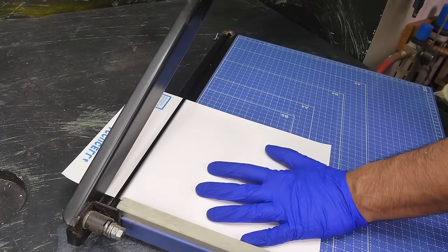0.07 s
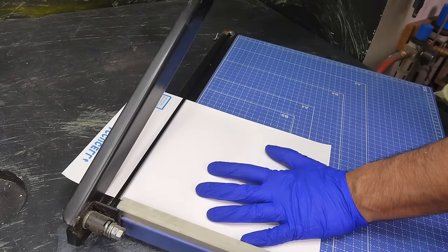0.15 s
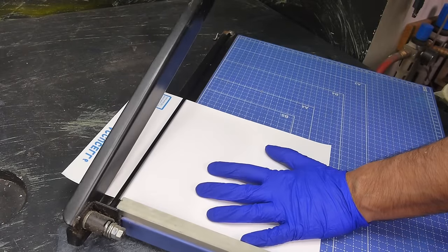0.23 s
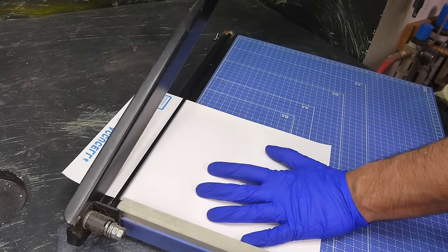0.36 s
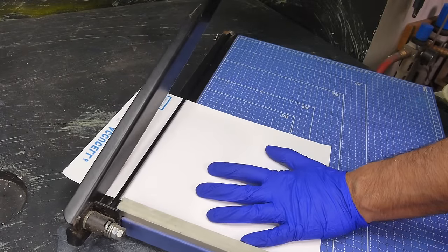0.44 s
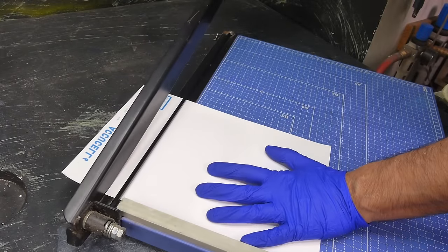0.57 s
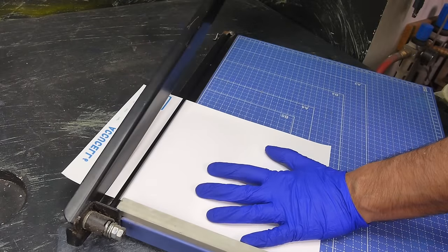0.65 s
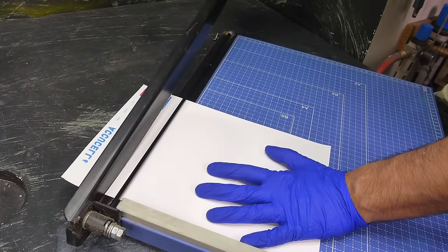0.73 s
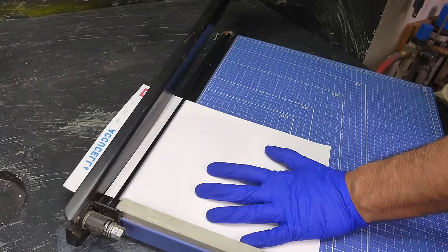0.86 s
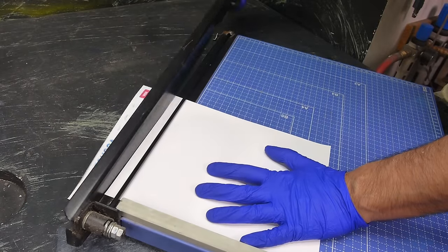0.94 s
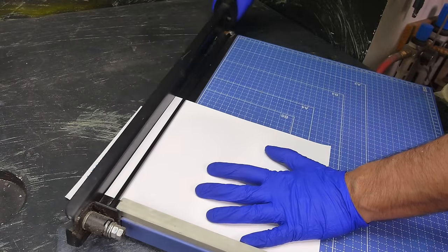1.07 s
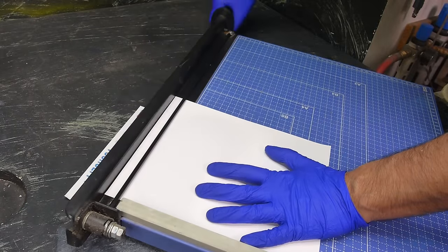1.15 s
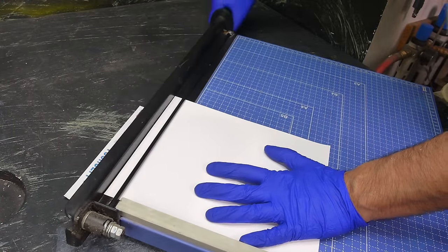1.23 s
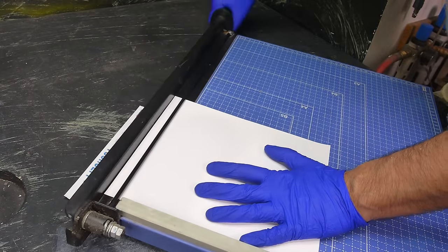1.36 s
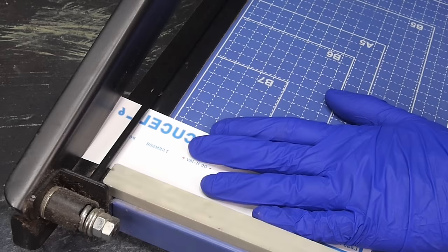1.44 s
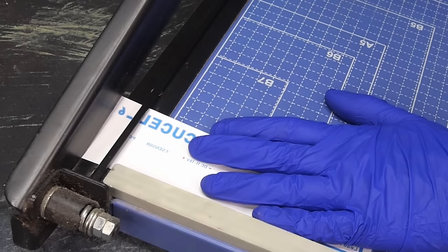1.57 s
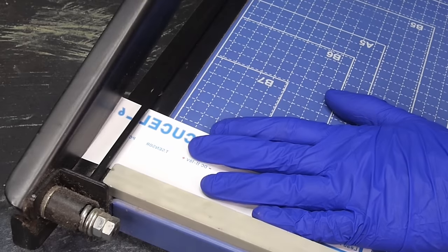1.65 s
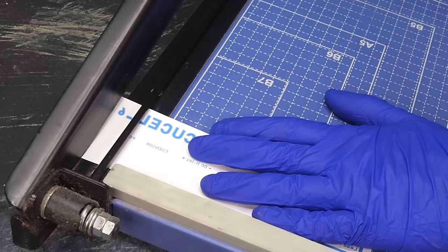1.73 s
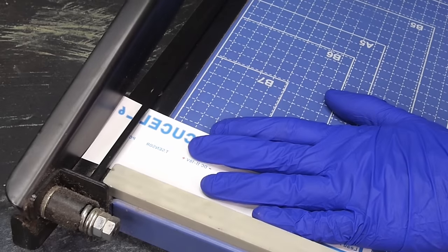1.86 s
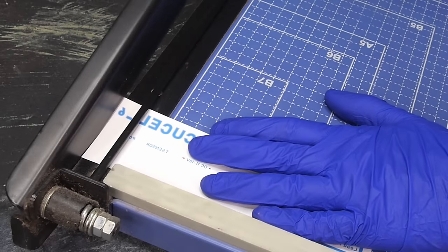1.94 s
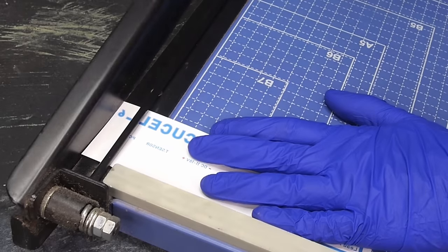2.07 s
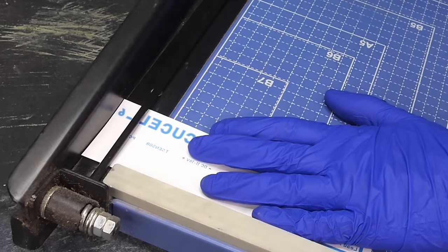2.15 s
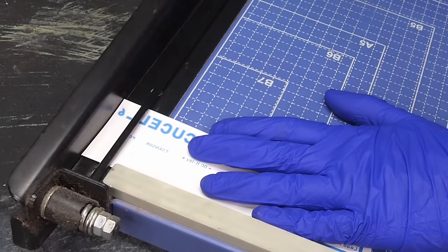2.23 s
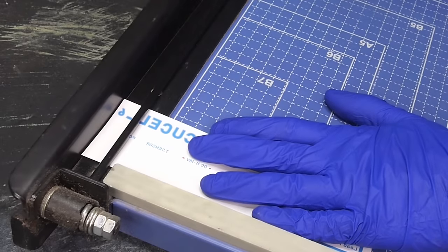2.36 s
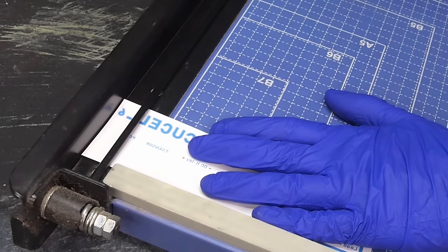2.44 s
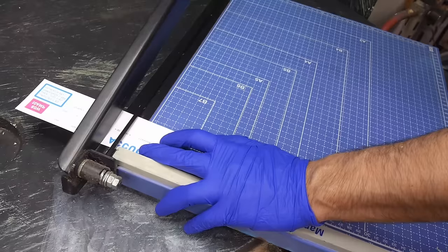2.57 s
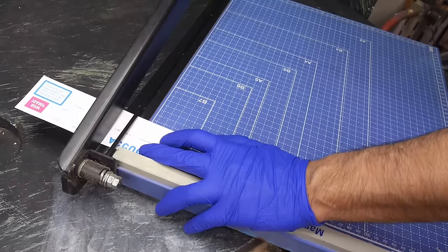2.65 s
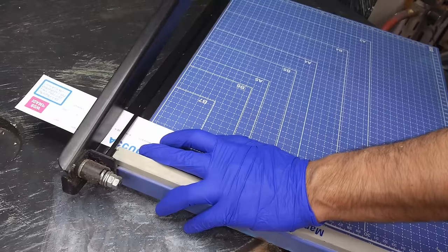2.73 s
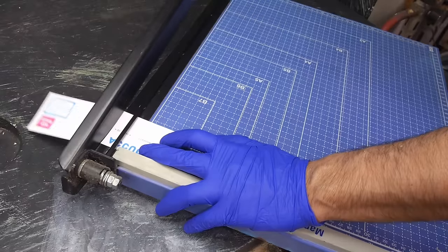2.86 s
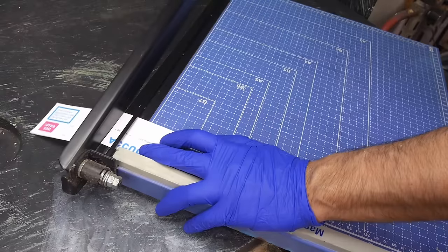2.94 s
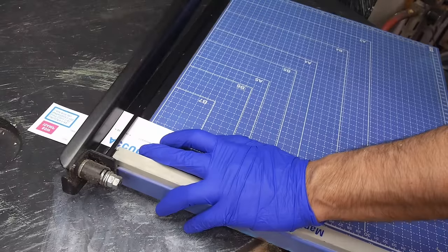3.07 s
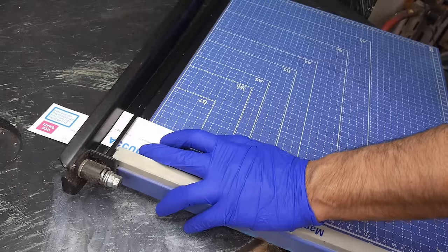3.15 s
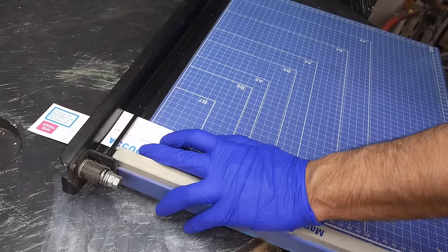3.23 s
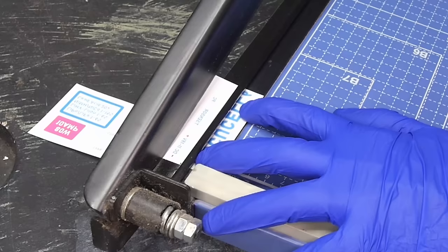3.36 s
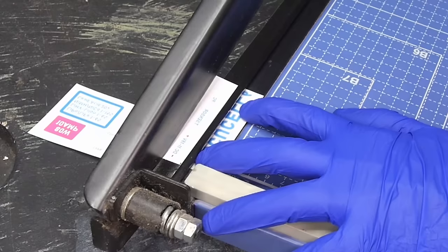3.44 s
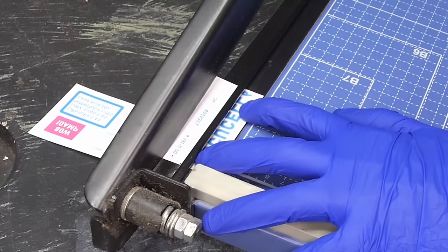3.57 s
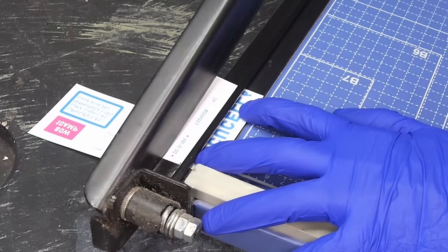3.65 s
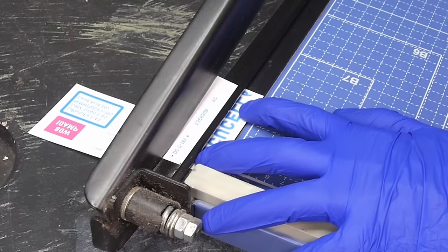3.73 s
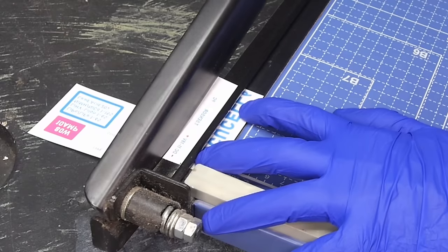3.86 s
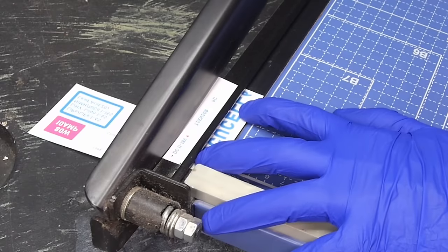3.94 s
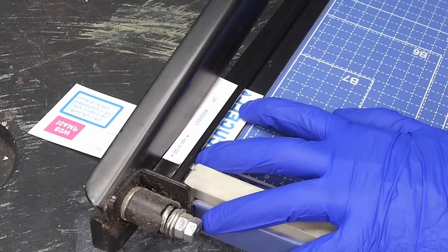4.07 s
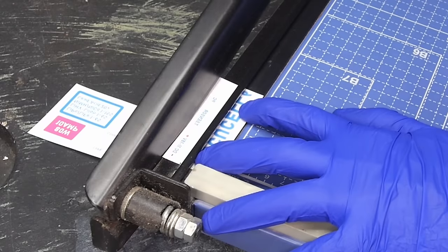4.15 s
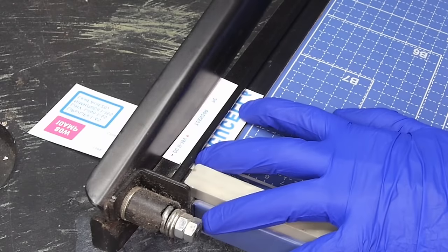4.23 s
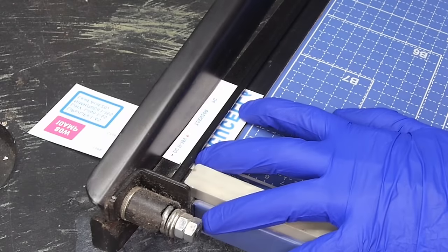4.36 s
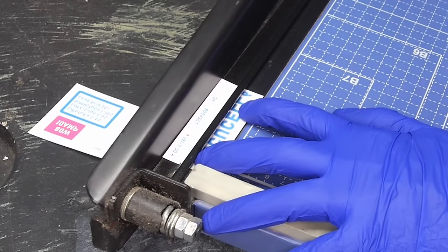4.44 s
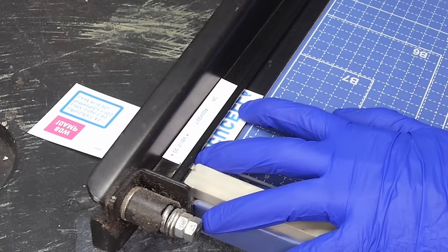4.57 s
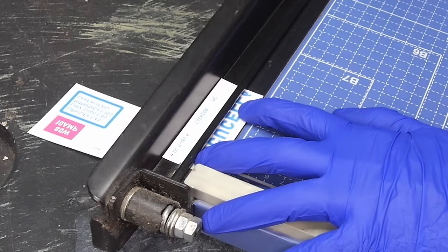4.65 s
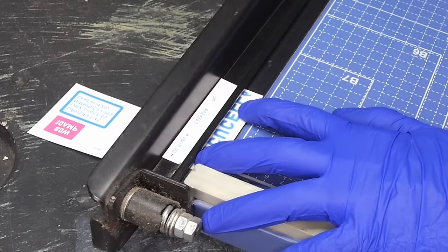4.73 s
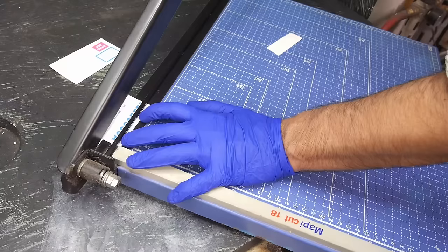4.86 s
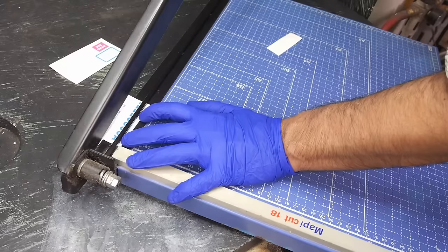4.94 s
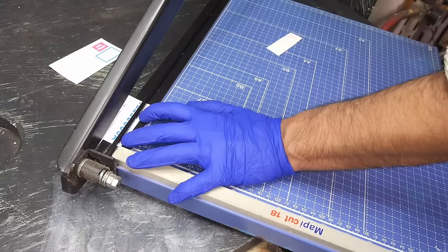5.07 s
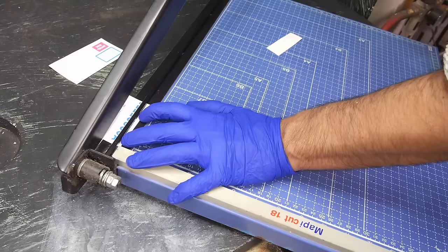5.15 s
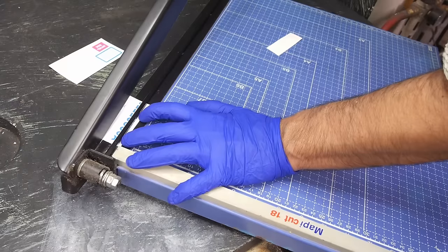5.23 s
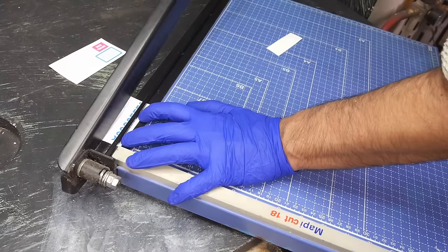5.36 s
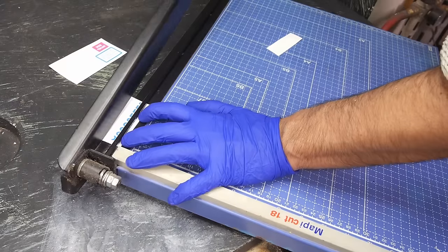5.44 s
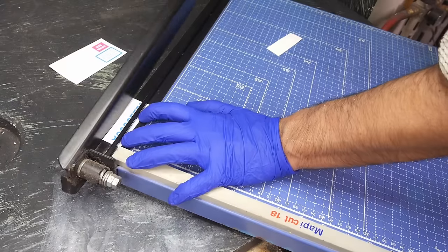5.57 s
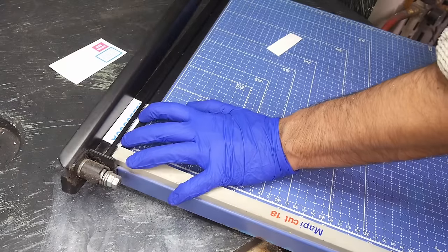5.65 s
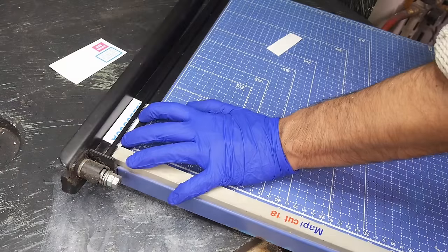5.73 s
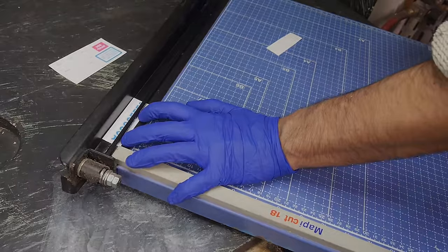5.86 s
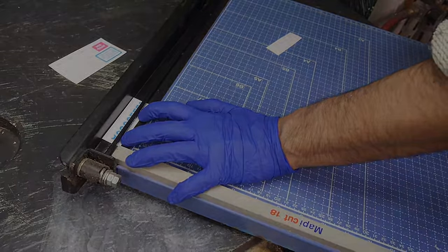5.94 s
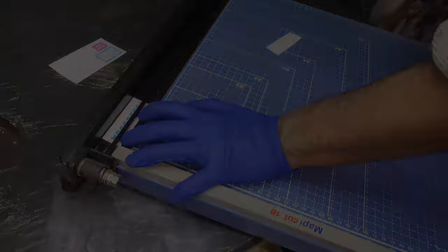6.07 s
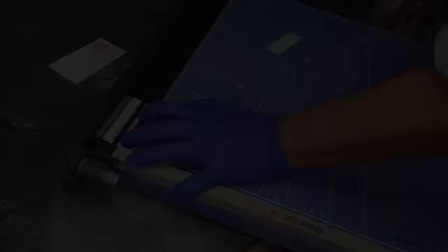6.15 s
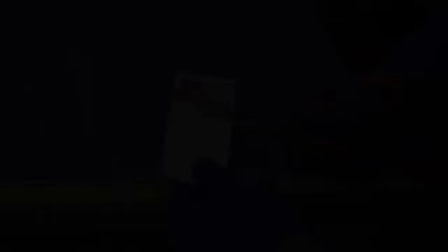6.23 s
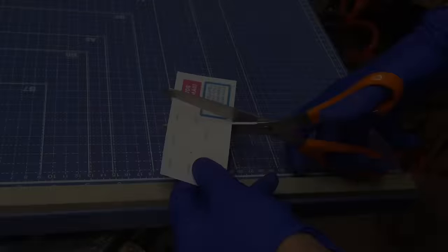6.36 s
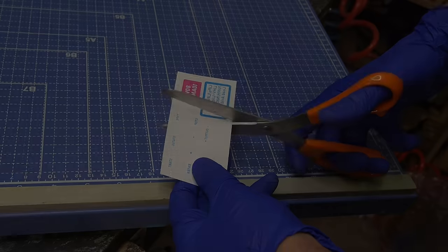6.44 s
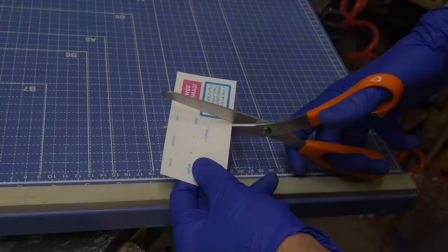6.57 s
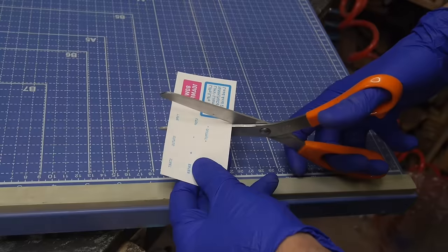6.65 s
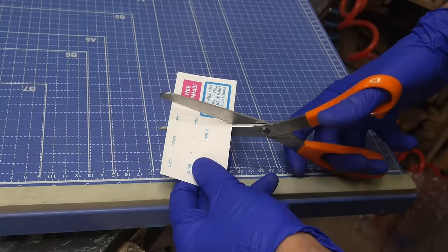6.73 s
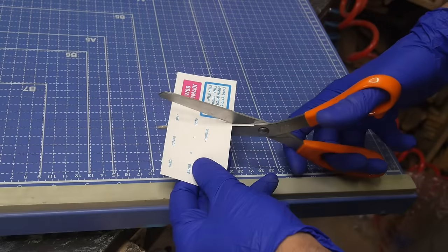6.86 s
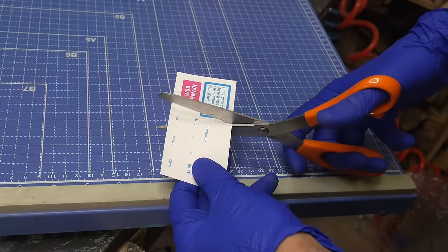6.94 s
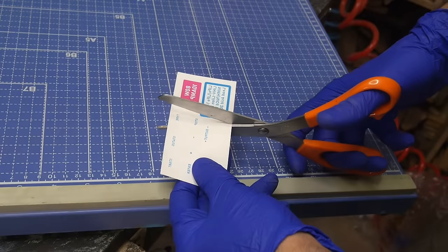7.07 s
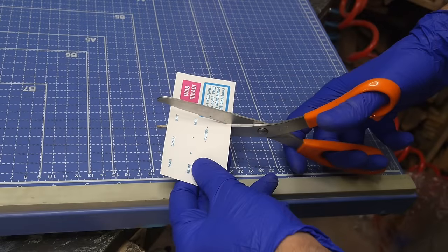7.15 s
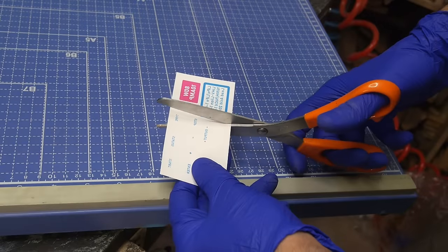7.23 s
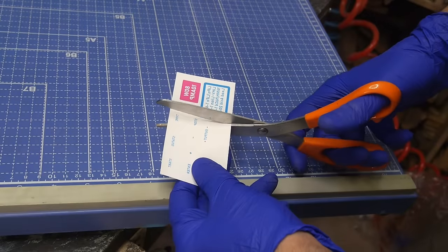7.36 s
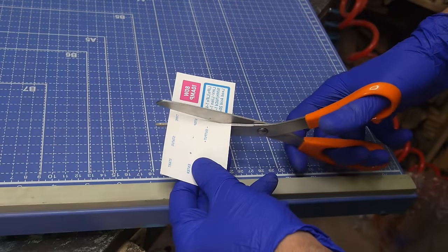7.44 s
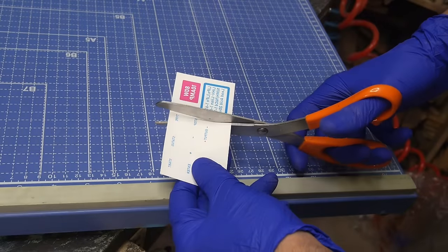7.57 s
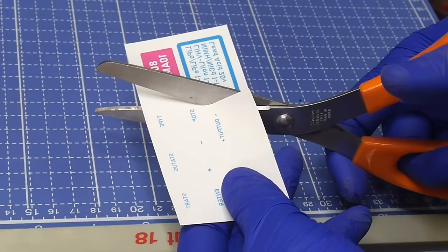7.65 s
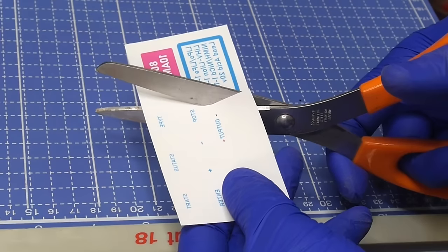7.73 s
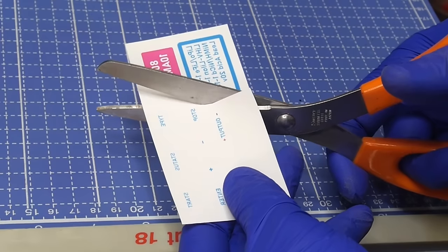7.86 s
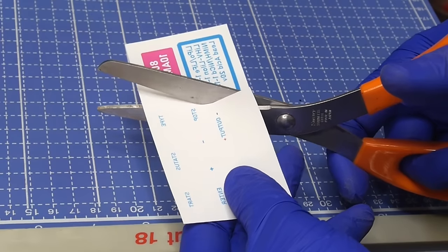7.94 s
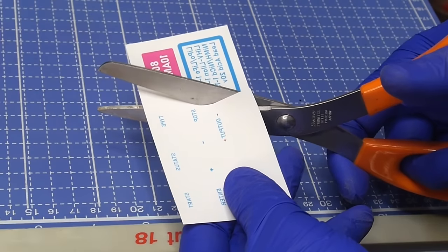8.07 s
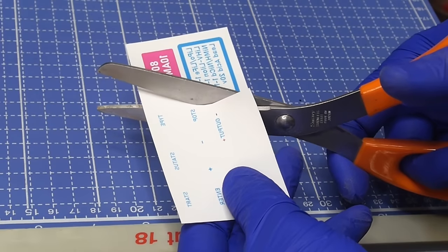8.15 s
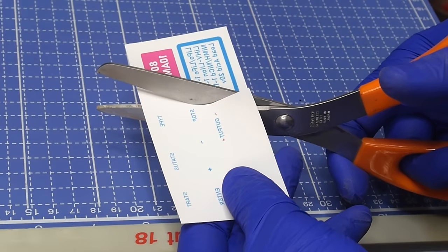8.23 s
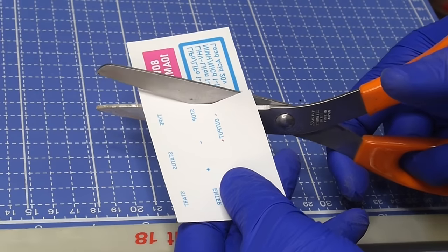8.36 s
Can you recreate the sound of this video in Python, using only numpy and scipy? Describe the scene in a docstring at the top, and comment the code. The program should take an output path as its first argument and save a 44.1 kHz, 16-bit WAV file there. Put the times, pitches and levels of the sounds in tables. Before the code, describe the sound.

A lever paper cutter, heard from close by, shears paper in five swelling, rasping strokes, three of which break off abruptly. The first has a short singing steel tone and a hard knock, and each later one carries a dull boom from the board. Small crisp paper snaps fall in between. At the end, scissors make faint little clicks in a card against the soft air of a quiet workshop.

```python
"""Faint paper snaps in a quiet workshop, then five strokes of a lever paper cutter. The steel blade grinds
along the bed edge, ringing board and blade while the sheet tears. In the first stroke the blade sings and the
lever knocks; in the others the board booms as the sheet parts. The sound stops sharply at the end of three
strokes. Afterwards scissors nibble faintly at a card."""
import sys
import numpy as np
from scipy import signal
from scipy.fft import rfft, irfft, next_fast_len
from scipy.io import wavfile
from scipy.ndimage import uniform_filter1d, map_coordinates

SR = 44100
rng = np.random.default_rng(int(sys.argv[2]) if len(sys.argv) > 2 else 0)


def transcribe(signal):
    """Save signal, clipped to [-1, 1], as a 16-bit WAV file at the path in sys.argv[1]."""
    frames = np.atleast_2d(signal).T
    limited = np.clip(frames, -1, 1)
    pcm = np.round(limited * 32767).astype(np.int16)
    wavfile.write(sys.argv[1], SR, pcm)


N = 370440
T = np.arange(N) / SR

# stereo image of close and distant sounds: (frequency [Hz], left-right likeness [0-1])
NEAR_IMAGE = [(60, 1), (180, 1), (550, 0.92), (1650, 0.92), (3000, .95), (8000, 0.72), (15000, 0.75)]
FAR_IMAGE = [(60, 1), (240, 0.98), (950, 0.47), (3770, 0.96), (15000, 0.86)]
# tone colour of room air, crisp paper and tearing: (frequency [Hz], relative density [dB])
AIR_COLOUR = [(35, -29.5), (60, -11.5), (152, -30), (187, -14), (272, -20), (394, -18), (585, -16.5),
              (642, -20.5), (889, -17), (999, -20), (1590, -22.5), (1790, -24.5), (2360, -31.5),
              (6710, -44), (15500, -61.5)]
CRISP_COLOUR = [(760, -38), (1300, -10.5), (2430, -12), (4010, -14.5), (4580, -24), (5280, -16.5),
                (15000, -47.5)]
TEAR_COLOUR = [(400, -28.5), (1000, -6.5), (2300, -2.5), (2760, -4.5), (3430, -10.5), (4150, -8),
               (4390, -12.5), (5150, -12), (5710, -15), (7030, -18), (8650, -19.5), (10100, -18.5),
               (13500, -26), (15500, -38)]
# a faint low drone: (frequency [Hz], relative level [dB])
DRONE_TONES = [(44.5, -76.5), (90, -88)]
# paper snaps near the blade: (time [s], relative level [dB])
PAPER_SNAPS = [(0.1374, -68), (0.2154, -66), (0.2788, -66), (0.8154, -31.5), (1.035, -47), (1.492, -72.5),
               (1.5877, -59), (1.651, -60), (2.161, -34.5), (3.674, -63), (4.033, -53), (4.726, -44.5),
               (4.796, -50.5), (5.3376, -60.5), (5.975, -46), (6.2446, -61)]
# one list a stroke; pressure sets the board level, the grind top is the moving upper edge of its band:
# (time [s], board level [dB], grind top [Hz], tearing level [dB])
CUTS = [
    [(0.36, -64, 700, -68), (0.5, -52.5, 720, -60), (0.62, -40.5, 800, -57), (0.73, -36, 1400, -49.5),
     (0.85, -33.5, 1520, -44), (0.93, -25.5, 1588, -40), (0.99, -27, 2232, -42), (1.06, -29.5, 2200, -39.5),
     (1.1, -35.5, 1600, -53), (1.2, -25.5, 2200, -47), (1.26, -28.5, 1900, -51.5), (1.38, -47, 1200, -69.5),
     (1.48, -65, 800, -85)],
    [(1.49, -73, 780, -75), (1.78, -75, 750, -74), (1.93, -43, 850, -55), (2.06, -36, 1450, -53),
     (2.13, -31.5, 1700, -47), (2.21, -35.5, 1100, -61), (2.3, -37, 950, -63), (2.36, -35, 896, -60),
     (2.4, -32.5, 1800, -57), (2.563, -37.5, 1750, -63)],
    [(2.575, -59, 600, -73), (2.62, -72, 570, -67), (2.74, -49.5, 700, -60), (2.89, -39.5, 1000, -56),
     (3.0, -31.5, 1700, -47.5), (3.07, -37, 1300, -64.5), (3.15, -34.5, 802.5, -65),
     (3.21, -36.5, 896.4, -58), (3.26, -30, 1750, -54), (3.397, -36.5, 1600, -68.5)],
    [(3.41, -67.5, 750, -65), (3.57, -64.5, 750, -70.5), (3.67, -77.5, 750, -83.5), (3.77, -50.5, 760, -63),
     (4.04, -40, 780, -60), (4.15, -42, 780, -60.5), (4.3, -35, 1550, -51), (4.44, -28, 1550, -45.5),
     (4.5, -35.5, 1500, -62), (4.58, -43, 800, -70.5), (4.72, -42, 770, -72), (4.74, -45, 770, -60),
     (4.79, -48, 760, -72), (4.853, -56.5, 750, -84)],
    [(5.08, -96, 800, -82.5), (5.4, -78.5, 800, -75.5), (5.412, -67, 807, -64.5), (5.46, -44.5, 820, -58.5),
     (5.53, -35, 1300, -49), (5.6, -31.5, 2169, -44), (5.67, -27.5, 2200, -38), (5.76, -36, 1500, -58),
     (5.9, -38, 1000, -65.5), (6.02, -53, 745.6, -73.5), (6.13, -75.5, 700, -74.5), (6.27, -95.5, 697, -82)],
]
# one value a stroke: left against right [dB]
CUT_PAN_DB = [1, -1.3, -0.25, -0.076, 0.12]
# one value a stroke: blade against board at a grind top of 1 kHz [dB], and its rise [dB/octave]
BLADE_MIX_DB = [-1.5, -3, -4, -3.5, -2]
BLADE_RISE_DB = [4, 5.9, 5.6, 3, 5.65]
# resonances, weighted anew by grip and sheet in each stroke:
# (frequency [Hz], width [Hz], relative level [dB], five changes for strokes 1-5 [dB])
BOARD_MODES = [(138.9, 20, -6.5, 0.17, 2.5, 0.99, 1.5, -2.5), (210, 25, -13.5, 0, -1.5, -1, -1, -0.5),
               (299, 21, -6, 0.96, 1, -0.57, -0.5, 8), (372, 40, -13, -0.41, -5, -1, 2, -1.5),
               (411.2, 15, 0, -1, -3, -0.82, -1.8, -1), (524, 4.8, -4.5, -1.2, -6.5, -2.2, -2, 6.5)]
BLADE_MODES = [(589, 24, -6.5, -4.5, 5.5, 2.5, 1, 6), (652.8, 10, 1.5, 2.5, -0.5, 1.5, -1.5, -10),
               (702.3, 16, -6, -2.5, 6.5, -1.5, -0.5, 2), (761.5, 25, -10, 2, 4, 0, -4, -0.5),
               (878, 18, -13, 7, 2.5, 2.5, -2.5, -4), (956.5, 29, -10, 2.5, 7, 0, -1.5, -6),
               (1093.7, 170, -13, 3, 1.5, 2, 0.5, -0.5), (1168, 41, -9, 5, -4, -3.5, -1, -0.5),
               (1221, 19, -9.5, -3.5, 2.5, 2.5, 2, 2), (1340, 15, -15.5, 7, -7.5, 0, 1.5, -2.5),
               (1346.7, 15, -5, -1, 14, -5, 2, -4), (1406, 18, -7, 1, 8.5, -4, 1, -2.5),
               (1450, 24, -8, -1, -5, 0, 2, -2.5), (1566, 82, -11.5, -3.5, 1, 2.5, -2.5, -3.5),
               (1727, 23, -10, 2, -1, -0.5, 4, 1.5), (1909, 50, -11, -9, -1.5, 2, 0.5, 2.5),
               (2105, 24, -11, 3, -2.5, 3, 6, 8), (2180, 8.1, -10.5, 0, 0, 5, -2, 5)]
# high steel modes lit by the tearing: (frequency [Hz], width [Hz], relative level [dB])
SHEEN_MODES = [(2440, 40, 2), (2570, 28, -2), (2800, 40, 0), (2990, 30, 0), (3170, 57, 3), (3570, 41, 4.5),
               (4120, 75, -2), (4680, 81, 1.5), (5037, 150, 3), (5420, 52, 5), (5840, 70, 0.5),
               (6500, 33, -1.5), (7776, 49, -3), (8510, 110, -6.5), (9830, 90, 5.5), (11300, 52, 1.5)]
# swell of the singing blade: (time [s], level [dB])
SONG_LEVELS = [(0.38, -76), (0.5, -43.5), (0.62, -51), (0.8, -36.5), (0.86, -28), (0.94, -46), (1.0, -19.5),
               (1.065, -16), (1.12, -36)]
# the lever strikes: (time [s], relative body level [dB], relative crack level [dB])
LEVER_KNOCKS = [(1.2142, 0, -17), (6.186, -52, -73.5)]
# the board booms: (time [s], level [dB])
BOOMS = [(2.22, -33.5), (3.1, -38.5), (4.53, -40), (5.86, -40)]
# the edge bites afresh and the blade rings up: (time [s], boost [dB])
EDGE_CATCHES = [(2.39, 4), (3.27, 5), (5.62, 2)]
# scissor blades rub: (time [s], level [dB])
RUB_LEVELS = [(6.9, -95), (7.17, -81), (7.6, -78), (7.75, -85), (8.4, -88)]
# scissor blades bite the card: (time [s], relative level [dB])
CARD_BITES = [(7.0054, -60), (7.1094, -58.5), (7.4634, -58.5), (7.6124, -55), (7.6271, -55.5),
              (7.6783, -52.5), (7.7443, -58.5), (7.9158, -51.5), (8.1264, -49.5), (8.131, -47),
              (8.1384, -46), (8.1754, -52.5), (8.1823, -49), (8.279, -48), (8.285, -50), (8.3046, -58),
              (8.3345, -52)]
# resonances of the card: (frequency [Hz], width before widening [Hz], relative level [dB])
CARD_MODES = [(1600, 40, -4), (2070, 140, 4), (2424, 40, 4.5), (2880, 46, 5), (3220, 33, -5.5),
              (3760, 13, -6), (5200, 39, -26)]
# a thin rising squeak: (time [s], frequency [Hz], level [dB])
SQUEAK_GLIDE = [(7.18, 6100, -91), (7.62, 6900, -88)]

BOOM_HALF_WIDTH_S = 0.052


def amp(db):
    return 10 ** (np.asarray(db) / 20)


def unit(x):
    return x / np.sqrt(np.mean(x ** 2) + 1e-20)


def along(points, hz):
    """Read (Hz, value) points on a log frequency axis."""
    f, v = np.transpose(points)
    return np.interp(np.log(hz + 1), np.log(f + 1), v)


def level(s, db):
    """A fader ride through dB points, silent outside them, with edges a few ms soft."""
    return uniform_filter1d(amp(np.interp(T, s, db, left=-200, right=-200)), size=150)


def wobble(rate):
    """A smooth random curve, rate knots a second."""
    return map_coordinates(rng.standard_normal(int(N * rate / SR) + 4), [T * rate])


def patches(shape, bins, frames):
    """A random field of rms 1, smooth over some bins and frames."""
    field = uniform_filter1d(rng.standard_normal(shape), size=bins, axis=0)
    field = uniform_filter1d(field, size=frames, axis=1)
    return unit(uniform_filter1d(field, size=frames, axis=1))


def swell(rows, width):
    """Sum of bell-shaped bumps at (s, height)."""
    return sum(h * np.exp(-((T - s) / width) ** 2) for s, h in rows)


def bursts(rows, t60, tail_db, rise_s):
    """Envelope of (s, dB) hits that die by 60 dB in t60 seconds, with a weak room tail."""
    env = np.zeros(N + SR)
    t = np.arange(SR // 4) / SR
    fall = amp(-60 * t / t60) + amp(tail_db - 60 * t / .3)
    for s, db in rows:
        env[round(s * SR):][:len(t)] += amp(db) * fall * (1 - np.exp(-t / rise_s))
    return env[:N]


def filtered(x, response):
    """Filter x by a complex response of frequency."""
    n = x.shape[-1]
    m = next_fast_len(n + SR // 2)
    return irfft(rfft(x, m) * response(np.fft.rfftfreq(m, 1 / SR)), m)[..., :n]


def band(hz, low, high=np.inf, steep=4):
    """Gain of a low cut with an optional high cut of order steep."""
    return 1 / (1 + (low / (hz + 1)) ** 4 + (hz / high) ** steep)


def modes(table, hz, widen=1):
    """Causal response of (Hz, width, dB) resonances."""
    return sum((-1) ** k * amp(db) * 1j * hz * w * widen / (c * c - hz * hz + 1j * hz * w * widen)
               for k, (c, w, db, *_) in enumerate(table))


def stereo_noise(image):
    """White noise with the given left-right likeness."""
    def mid_side(hz):
        turn = np.arccos(along(image, hz)) / 2
        return np.array([np.cos(turn), np.sin(turn)])
    mid, side = filtered(rng.standard_normal((2, N)), mid_side)
    return np.array([mid + side, mid - side])


def coloured_noise(image, response):
    return unit(filtered(stereo_noise(image), response))


def narrow_noise(hz, spread):
    """Noise of rms 1 in a band that follows hz, about spread Hz wide."""
    phase = 2 * np.pi * np.cumsum(np.broadcast_to(hz, N)) / SR
    return unit(wobble(spread) * np.cos(phase) + wobble(spread) * np.sin(phase))


def stroke_at(s):
    return np.searchsorted([rows[0][0] for rows in CUTS[1:]], s)


def workshop_air():
    """Soft room noise that breathes slightly."""
    return amp(-71.5 + .8 * wobble(3)) * coloured_noise(FAR_IMAGE, lambda hz: amp(along(AIR_COLOUR, hz)))


def low_drone(cutter_level):
    """A faint wavering drone near 45 and 90 Hz that ducks while the cutter is loud."""
    drone = 0
    for hz, db in DRONE_TONES:
        gain = amp(db + 9 + 2.8 * wobble(4.4))
        drift = 18 * np.cumsum(wobble(5.9)) / SR
        drone += gain * np.sin(2 * np.pi * hz * T + drift)
    return drone / (1 + (cutter_level / amp(-42.5)) ** 3)


def paper_snaps():
    """Puffs of crisp noise from the sheet."""
    crisp = coloured_noise(NEAR_IMAGE, lambda hz: amp(0.89 * along(CRISP_COLOUR, hz)))
    return bursts(PAPER_SNAPS, t60=0.059, tail_db=-18, rise_s=.003) * amp(-4) * crisp


def grind(body, top_hz, judder, steep, leak_db, wander_db):
    """Rough steel slides over steel and drives a body; the contact travels, so modes swell and fade."""
    hz, s, roughness = signal.stft(stereo_noise(NEAR_IMAGE) * judder, SR, nperseg=1024)
    top = np.interp(s, T, top_hz)
    ratio = hz[:, None] / top
    drive = 1 / np.sqrt(1 + ratio ** steep) + amp(leak_db) / (1 + ratio ** 2)
    columns = np.transpose(body)
    grip_db = np.transpose([np.interp(hz, columns[0], db) for db in columns[3:]])
    tilt_db = -0.5 * np.log2(hz[:, None] / 500 + .1) * np.log2(top / 1300)
    drive *= amp(grip_db[:, stroke_at(s)] + tilt_db + wander_db * patches(drive.shape, 2, 9))
    # hold the loudness while the colour moves
    body_power = uniform_filter1d(np.abs(modes(body, np.arange(SR // 2))) ** 2, size=65)
    drive /= np.sqrt(np.mean(drive ** 2 * body_power[hz.astype(int) - 1, None], axis=0))
    friction = signal.istft(roughness * drive, SR, nperseg=1024)[1][:, :N]
    return unit(filtered(friction, lambda f: modes(body, f) * band(f, 95)))


def blade_gain(top_hz, settle_s=.08, hush_db=-4.5):
    """Blade against board: it rings more as the grind top rises and at each catch, less in a boom."""
    stroke = stroke_at(T)
    rise_db = np.take(BLADE_RISE_DB, stroke) * np.log2(top_hz / 1000)
    catch_db = sum(db * (T > s) * np.exp(-np.abs(T - s) / settle_s) for s, db in EDGE_CATCHES)
    duck_db = swell([(s, hush_db) for s, _ in BOOMS], BOOM_HALF_WIDTH_S)
    return amp(np.take(BLADE_MIX_DB, stroke) + rise_db + uniform_filter1d(catch_db, size=1200) + duck_db)


def tearing(paper_level, board_level, judder):
    """Fibres crackle as they part and light the steel's high modes."""
    fibres = unit(amp(0.82 * wobble(350) + 1.1 * wobble(30)) * judder ** 0.35)
    spectrum = signal.stft(stereo_noise(NEAR_IMAGE) * fibres, nperseg=1024)[2]
    flicker = amp(3.5 * patches(spectrum.shape[1:], 2, 6))
    hiss = signal.istft(spectrum * flicker, nperseg=1024)[1][:, :N]
    colour = lambda hz: amp(along(TEAR_COLOUR, hz)) * (1.8 + np.abs(modes(SHEEN_MODES, hz)))
    tear = unit(filtered(hiss, colour))
    # clean tearing is brighter than the rub of a returning blade
    brightness = np.clip(paper_level / (board_level + 1e-6) * amp(13.5), .05, 1.4) ** 0.13
    treble = filtered(tear, lambda hz: band(hz, 6500))
    return paper_level * (tear + (brightness - 1) * treble)


def cutter():
    """The edge catches and slips, shaking board and blade. Returns the sound and the grind level."""
    strokes = [np.transpose(rows) for rows in CUTS]
    times, _, tops, tear_db = np.concatenate(strokes, axis=1)
    top_hz = np.interp(T, times, tops)
    board_level = sum(level(s, db) for s, db, _, _ in strokes)
    blade_level = board_level * blade_gain(top_hz)
    booms = board_booms()
    judder = unit(amp(0.37 * wobble(70) + 1.2 * wobble(16)))
    paper = tearing(level(times, tear_db), board_level, judder)
    wood = board_level * grind(BOARD_MODES, top_hz, judder, steep=27, leak_db=-20, wander_db=2.5)
    steel = blade_level * grind(BLADE_MODES, top_hz, judder, steep=57, leak_db=-5, wander_db=4.5)
    pan_db = np.take(CUT_PAN_DB, stroke_at(T))
    return (booms + wood + steel + paper) * amp([pan_db / 2, -pan_db / 2]), board_level + blade_level


def blade_song(pitch_hz=641):
    """The long blade sings near its strongest mode in the first stroke."""
    gain = level(*np.transpose(SONG_LEVELS)) * amp(2 * wobble(14.8))
    hz = pitch_hz + 4 * wobble(11.98)
    return gain * np.sin(2 * np.pi * np.cumsum(hz) / SR)


def lever_knocks(delay_at_1khz_s=0.0028):
    """A short blow runs through blade and board as bending waves, treble first; a bright crack leads."""
    def response(hz):
        bend = np.exp(-4j * np.pi * delay_at_1khz_s * np.sqrt(1000 * hz))
        push = lambda soft_hz: bend / (1 + 1j * hz / soft_hz) ** 2
        wood = amp(40) * modes(BOARD_MODES, hz, widen=2.5) * push(706) * band(hz, 100)
        steel = amp(34) * modes(BLADE_MODES, hz, widen=6) * push(3000)
        click = amp(17) * push(2452) * band(hz, 200, 2500)
        return wood + steel + click
    blows = np.zeros(N)
    for s, db, _ in LEVER_KNOCKS:
        blows[round(s * SR)] = amp(db)
    ring = filtered(signal.unit_impulse(SR // 2), response)
    cracks = bursts([(s + .0006, db) for s, _, db in LEVER_KNOCKS], t60=.02, tail_db=-24.5, rise_s=.00033)
    bright = coloured_noise(NEAR_IMAGE, lambda hz: band(hz, 1200, 8500, steep=12))
    return signal.fftconvolve(blows, ring)[:N] + amp(-7.5) * cracks * bright


def board_booms():
    """The sheet has parted and the board booms on its lowest mode."""
    gain = swell([(s, amp(db)) for s, db in BOOMS], BOOM_HALF_WIDTH_S)
    return gain * narrow_noise(BOARD_MODES[0][0], spread=25)


def scissors(start_s=6.4, end_s=8.8):
    """Clear bites and faint random nibbles ring the card's modes over a soft rub and a thin squeak."""
    def card(hz):
        ring = amp(-3.5) * modes(CARD_MODES, hz, widen=2.5) / (1 + (hz / 7000) ** 2)
        return amp(along(CRISP_COLOUR, hz)) + ring
    when, size = rng.random(size=(20, 2)).T
    nibbles = zip(start_s + when * (end_s - start_s), -65.5 + 6 * size)
    hits = bursts([*CARD_BITES, *nibbles], t60=0.0333, tail_db=-19, rise_s=0.00045)
    bites = amp(-7.5) * hits * coloured_noise(FAR_IMAGE, card)
    rub_level = level(*np.transpose(RUB_LEVELS)) * amp(3 * wobble(25))
    rub = rub_level * coloured_noise(FAR_IMAGE, lambda hz: amp(0.98 * along(CRISP_COLOUR, hz)))
    s, hz, db = np.transpose(SQUEAK_GLIDE)
    squeak = level(s, db) * amp(2 * wobble(18)) * narrow_noise(np.interp(T, s, hz), spread=700)
    return bites + rub + squeak


def scene():
    strokes, cutter_level = cutter()
    cutting = strokes + blade_song() + lever_knocks() + paper_snaps() + scissors()
    return cutting + workshop_air() + low_drone(cutter_level)


def record(dry):
    """The camera keeps nothing above its band limit and sits slightly off zero."""
    return filtered(dry, lambda hz: hz < 15665) - .0029


dry = scene()
out = record(dry)
transcribe(out)
```